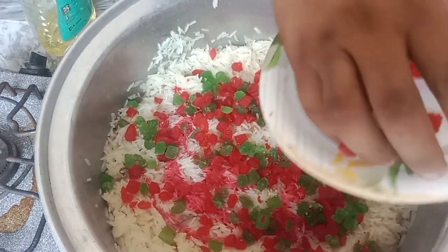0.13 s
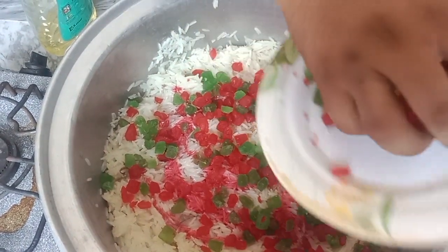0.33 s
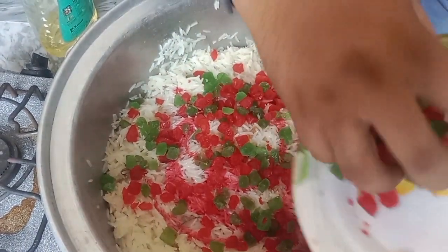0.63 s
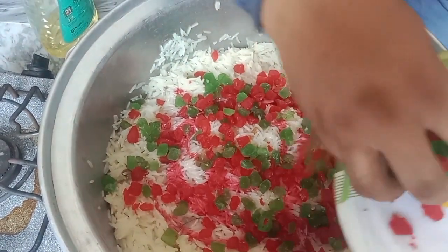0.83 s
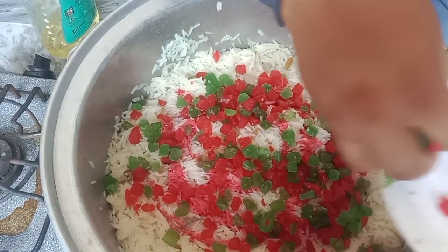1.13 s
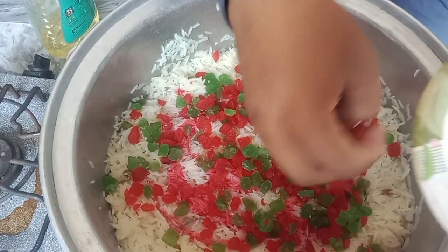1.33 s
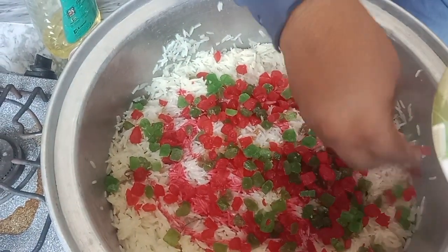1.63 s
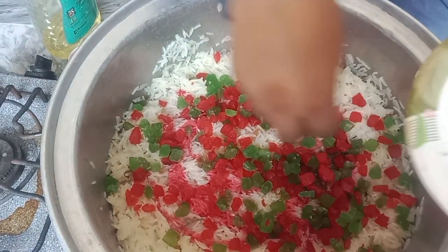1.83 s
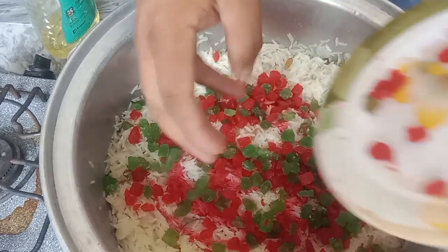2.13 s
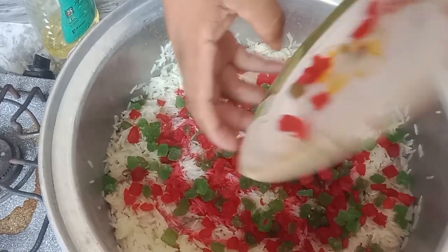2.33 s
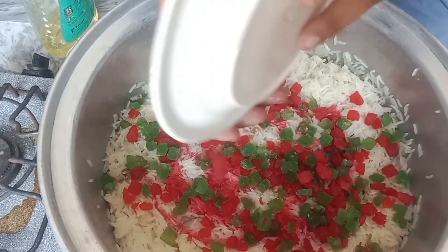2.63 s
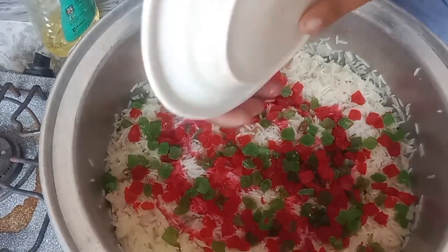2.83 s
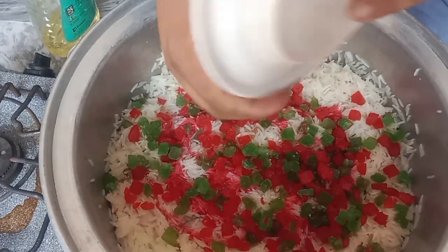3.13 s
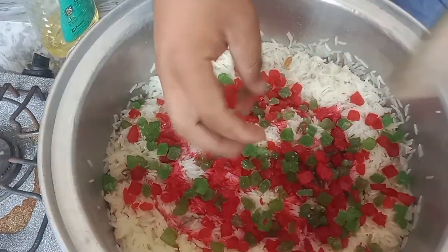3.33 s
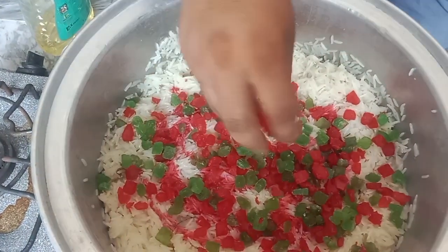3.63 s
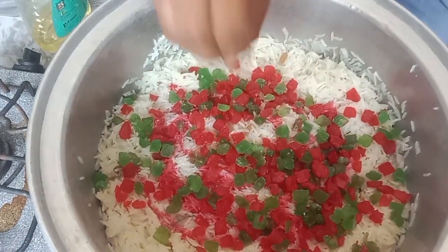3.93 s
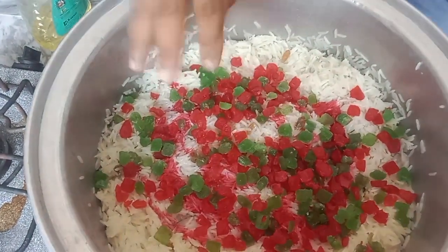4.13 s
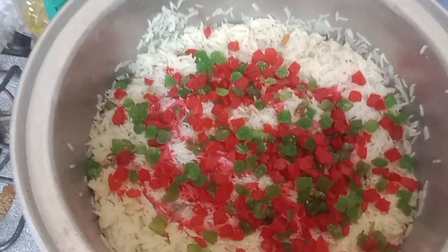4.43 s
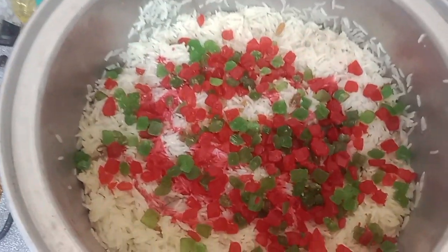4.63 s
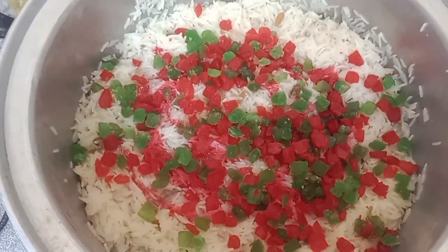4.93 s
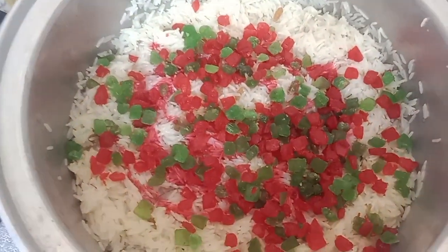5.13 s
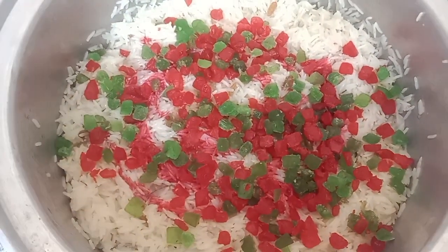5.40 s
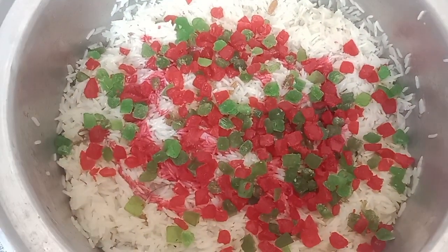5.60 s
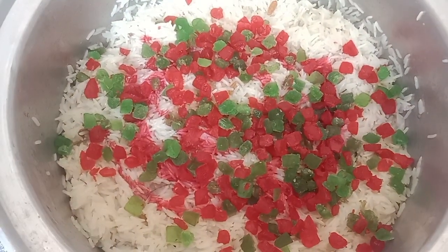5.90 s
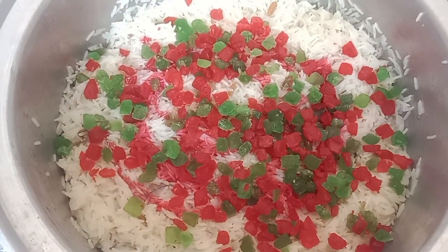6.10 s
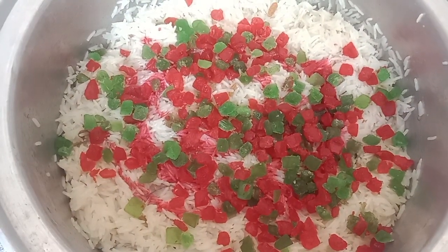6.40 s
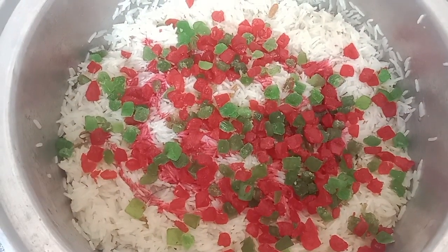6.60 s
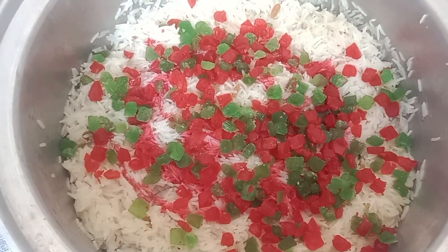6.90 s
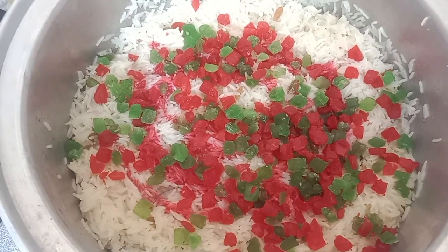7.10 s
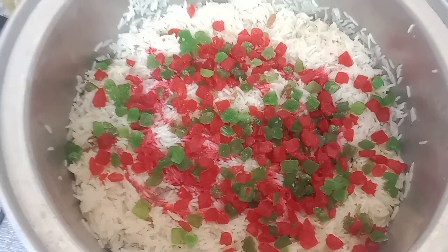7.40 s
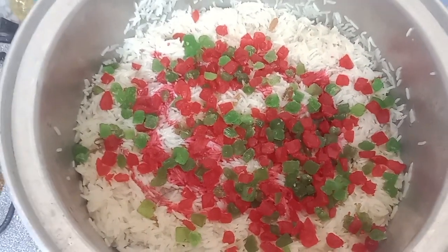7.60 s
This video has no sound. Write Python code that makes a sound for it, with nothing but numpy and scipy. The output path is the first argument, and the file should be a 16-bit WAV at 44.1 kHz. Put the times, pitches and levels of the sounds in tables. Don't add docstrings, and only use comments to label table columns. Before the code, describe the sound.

Rice sizzles softly and crackles in a metal pot as small pieces patter in, then a bowl and dishes clatter and a stool scrapes.

```python
import sys
import numpy as np
from scipy import signal
from scipy.fft import rfft, irfft, next_fast_len
from scipy.io import wavfile
from scipy.ndimage import uniform_filter1d

SR = 44100
rng = np.random.default_rng(int(sys.argv[2]) if len(sys.argv) > 2 else 0)


def undo_db(level):
    steps = np.asarray(level, float) / 20
    return 10 ** steps


def int16_out(signal):
    q = np.round(np.clip(np.atleast_2d(signal).T, -1, 1) * 32767)
    wavfile.write(sys.argv[1], SR, q.astype(np.int16))


N = 341775

# time in seconds, level in dB.
HEAT = [(0, -51), (.6, -54.5), (1.06, -52.5), (1.3, -51.5), (2.178, -52.5), (3.5, -51.5), (4.06, -50.5),
        (4.66, -44.5), (5.251, -43.5), (5.7, -43.5), (6.24, -48.5), (6.6, -50), (7.0, -46.5), (7.45, -52.5),
        (7.75, -51)]
# start in seconds, time held in seconds, then the lift in dB
OPENINGS = [(.03, 0.026, -2, 2, 3), (.2, 0.046, 0.5, -2, -6), (.27, 0.15, 2.5, 1, 9),
            (0.572, 0.18, 0, 2.5, 4.5), (.8, 0.14, 0.5, 4, 10), (1.035, 0.13, -3.5, -4, 0.5),
            (1.18, 0.022, 5.5, 8.5, 9.5), (1.36, 0.11, -1, 6.5, 6), (1.52, 0.02, 0.5, 2.5, 13),
            (1.671, 0.25, 2.5, 8, 7.5), (1.9, 0.018, -3.5, -13, -6), (2.24, 0.023, 2, 6, -1.5),
            (2.36, 0.046, 2.5, 0.5, 11), (2.55, 0.047, 2, 8, 8), (2.72, 0.17, 1.5, 3, 1.5),
            (2.9, 0.065, 0.5, 5.5, 5.5), (3.05, 0.055, 3.5, 10, 5), (3.2, 0.12, 0.5, 5.5, 3.5),
            (3.4, 0.28, 0, 0.5, 1), (3.58, 0.069, 3, 8, 5.5), (3.859, 0.036, 6.5, 8.5, 7),
            (4.03, 0.093, 0, -10, 0.5), (4.2, 0.26, -1, -6, -7), (4.379, 0.14, 6, 7.5, 16),
            (4.56, 0.13, 0.5, -9.5, 5), (4.67, 0.03, -2, 1, -20), (4.801, 0.086, 2, 10.5, 22),
            (4.96, 0.13, 3, -0.5, 10), (5.3, 0.1, -1, -11, -11), (5.481, 0.13, 2, 6.5, 6.5),
            (5.698, 0.009, -1, -7.5, -4), (5.761, 0.14, 3, 2, 5), (5.9, 0.092, 1, 7, 2),
            (6.05, 0.017, 0, -8, 0), (6.109, 0.11, 2, 6, 3.5), (6.5, 0.078, 1, 7, 2.5),
            (6.72, 0.027, 0, 7, 8), (6.84, 0.065, 1.5, 15, 15), (7.511, 0.054, 2, 8, 6),
            (7.7, 0.056, 1.5, 2, 13.5)]
PHONE_LOWERED = (3.3, 6.82)
# frequency in Hz, level in dB per Hz.
FIZZ_HIGH_COLOUR = [(1100, -31.5), (1700, -16.5), (2050, -14), (2400, -4.5), (3200, -5), (4500, -11.5),
                    (4950, -21), (5400, -17.5), (6100, -22), (6500, -17.5), (7700, -18), (8800, -25),
                    (9300, -80), (12700, -52)]
# frequency in Hz, level in dB per Hz.
FIZZ_CLOSE_COLOUR = [(880, -50), (1500, -52), (1660, -15), (1900, -35), (2100, -25), (2250, -6.5),
                     (2400, -5), (2900, 0.5), (5400, -8.5), (6210, -17.5), (7560, -10.5), (9800, -32.5),
                     (12700, -25), (21600, -120)]
# frequency in Hz, level in dB per Hz.
SPIT_COLOUR = [(5290, 8), (9000, -1), (9460, -2), (10900, -7), (12900, 6.5), (14000, -5), (14900, 3),
               (15800, -20.5)]
# time in seconds, peak in dB.
SHOWERS = [
    (4.379, -45.5),
    (5.12, -68),
    (6.83, -63),
]
# time in seconds, peak in dB.
SINGLE_SPITS = [(2.7763, -50), (3.0275, -53), (4.375, -36), (4.8813, -52), (5.485, -46), (6.7506, -46),
                (6.9172, -56), (7.0494, -46), (7.1252, -58), (7.512, -45),
                (0.4115, -61), (1.441, -56), (1.9026, -57), (1.9415, -55), (2.5641, -58.5), (2.777, -50),
               (2.9724, -53), (3.028, -55), (3.0764, -58), (4.375, -43), (4.8813, -42), (5.1677, -49),
               (5.3353, -62), (5.4844, -51), (5.5742, -50), (6.262, -51), (6.3974, -59), (6.4971, -59.5),
               (6.6962, -60), (6.8274, -45), (6.9172, -56), (7.0025, -55.5), (7.0499, -51), (7.1248, -53),
               (7.2998, -57), (7.5124, -47)]
# frequency in Hz, level in dB per Hz.
HUM_COLOUR = [(110, -50.5), (180, -20), (440, -12.5), (660, -27.5), (780, -2), (850, 4), (1040, -12),
              (1150, -36.5)]
# frequency in Hz, level in dB per Hz.
UPPER_HUM_COLOUR = [(900, -54), (1040, -20.5), (1210, -14.5), (1290, -5.5), (1380, -12.5), (1480, -15.5),
                    (1650, -15.5), (1900, -20), (2150, -13), (2730, -60)]
# time in seconds, peak in dB, ring in Hz.
CRACKLES = [(0.0305, -35, 2430), (0.185, -31.5, 2510), (0.3005, -48, 2540), (0.4294, -44, 3000),
            (0.6285, -38, 1450), (0.6649, -42.5, 2420), (0.8126, -37.5, 1060), (0.8614, -38, 1000),
            (0.999, -33.5, 2500), (1.0081, -40.5, 3730), (1.1905, -37, 1860), (1.2491, -30, 2900),
            (1.2756, -33.5, 2940), (1.321, -40, 2360), (1.3312, -33.5, 2700), (1.502, -46, 3000),
            (1.65, -45.5, 2920), (1.669, -29.5, 2100), (1.703, -33.5, 1500), (1.715, -37, 2550),
            (1.797, -46.5, 2660), (1.8424, -33, 2390), (1.8736, -35, 2800), (1.945, -40.5, 2500),
            (2.1555, -40.5, 2450), (2.3805, -31, 3220), (2.6954, -31, 3020), (2.7661, -31, 2950),
            (3.0924, -36, 2800), (3.1346, -32, 3100), (3.356, -33, 2500), (3.439, -38, 3330),
            (3.493, -38, 2280), (3.526, -35, 2730), (3.8676, -31.5, 2000), (3.805, -33.5, 5500),
            (4.036, -34.5, 2950), (4.119, -38.5, 6100), (4.145, -39, 3560), (5.1637, -28.5, 2840),
            (5.8462, -27, 4740), (5.991, -31.5, 2900), (6.052, -39.5, 5530), (6.201, -52, 1185)]
# time in seconds, peak in dB, ring in Hz, crack in dB.
FAT_POPS = [
    (4.175, -32, 3560, -19),
    (5.261, -35.5, 3400, -10),
    (5.75, -40, 870, -35),
    (5.772, -26.5, 2500, -11),
    (5.955, -27, 3290, -11.5),
    (6.097, -35, 3420, -7.5),
    (6.129, -34.5, 906, -18),
    (6.414, -31, 3900, -11),
    (7.554, -33, 1260, -11.5),
    (7.684, -29, 1320, -28),
]
# time in seconds, peak in dB, ring in Hz, crack in dB.
FRUIT = [(0.129, -22.5, 2560, -21), (0.265, -31.5, 3670, -33.5), (0.379, -27.5, 934, -23),
         (0.469, -37, 2360, -9), (0.486, -33, 3450, -21), (0.793, -35.5, 1130, -35.5),
         (1.172, -30, 2500, -39), (1.212, -29.5, 2450, -12.5), (1.354, -27, 3400, -18),
         (1.419, -28, 2480, -14.5), (1.442, -18, 2900, -12.5), (1.52, -36, 1300, -1),
         (1.662, -28.5, 886, -7.5), (1.696, -27.5, 3360, -12), (1.999, -34, 3260, -3.5),
         (2.349, -30, 3070, -17), (3.409, -37, 2840, -8.5), (3.827, -23.5, 1990, -18)]
# time in seconds, peak in dB, ring in Hz, crack in dB.
KNOCKS = [(4.377, -25, 1010, -16), (4.402, -23.5, 1090, -6), (4.456, -20.5, 1100, -15.5),
          (4.51, -21, 3350, -24), (4.594, -33, 1140, -22), (4.618, -29.5, 3500, -17),
          (4.784, -30, 1010, -5), (4.794, -36.5, 1010, 3), (4.837, -15.5, 3520, -19.5),
          (4.874, -8.5, 2750, -15.5), (4.89, -13.5, 2140, -13), (5.033, -23, 2640, -33),
          (5.095, -28.5, 3670, -17), (6.648, -13.5, 490, -32), (6.738, -27, 620, -29),
          (6.696, -23, 2400, -11), (6.75, -28, 4330, -13), (6.762, -23, 860, -27.5),
          (6.832, -21, 1004, -15), (6.905, -25, 2700, -20)]
# frequency in Hz, level in dB.
CRACK_COLOUR = [(300, -26.5), (1000, -5.5), (2200, 4.5), (4300, 2), (5800, -9.5), (7800, 5), (9500, -49),
                (13000, -29), (16000, -44)]
# start in seconds, level in dB, hollow in Hz, held in seconds.
BUMPS = [(.17, -66, 431, 0.19), (.27, -68, 382, 0.014), (1.23, -66.5, 444, 0.043), (1.529, -64, 497, 0.018),
         (2.249, -62, 322, 0.048), (2.27, -63.5, 660, 0.019), (2.37, -64, 488, 0.089),
         (2.56, -77, 260, .04), (2.6, -66, 510, 0.027), (2.54, -63.5, 690, 0.064),
         (3.044, -39.5, 277, 0.04), (3.059, -55.5, 416, 0.083), (3.22, -60.5, 291.6, 0.07),
         (3.449, -64, 459, 0.027), (3.562, -42.5, 402, 0.0098), (3.6, -53, 298, 0.047),
         (3.62, -53, 475.5, 0.041), (3.809, -68, 240, 0.059), (4.31, -81, 520, 0.056),
         (4.744, -55, 433, 0.1), (4.88, -50, 498, 0.062), (5.002, -48.5, 335, 0.07),
         (5.099, -53.5, 315, 0.029), (5.413, -57, 423, 0.24), (5.472, -43, 261, 0.098),
         (5.85, -60, 421, 0.049), (5.886, -44.5, 395, 0.028), (5.931, -52.5, 326, 0.028)]
# time in seconds, level in dB, pitch in Hz.
BOWL_TIPPED = (3.565, -41, 690)
# start in seconds, time held in seconds, ring in dB.
RIM_SKIDS = [
    (4.377, 0.0084, -31.5),
    (4.404, 0.017, -26),
    (4.455, 0.052, -40.5),
    (4.59, 0.19, -55),
]
# start in seconds, time held in seconds, level in dB.
BASE_DRAGS = [
    (4.405, 0.011, -30),
    (4.46, 0.089, -47.5),
]
# frequency in Hz, width in Hz, level in dB.
BOWL_MODES = [(550, 64, -24), (1010, 41, 5.5), (1246, 50, 0.5)]
# start in seconds, time held in seconds, level in dB.
DISH_SHAKES = [
    (4.784, 0.023, -30),
    (4.826, 0.02, -30.5),
    (4.879, 0.015, -25),
    (5.05, 0.15, -51.5),
]
# frequency in Hz, width in Hz, level in dB.
DISH_MODES = [(1010, 19, 8), (1300, 42, 6), (1730, 99, -13), (2240, 22, 9), (2700, 19, -6), (3700, 20, -18)]
# frequency in Hz, level in dB per Hz.
CLATTER_COLOUR = [(350, -63), (600, -28), (910, -38), (986, -35.5), (1150, -38.5), (1240, 10), (2400, 10),
                  (7200, -10.5), (9500, -36), (12400, -91), (20900, -120)]
# start in seconds, held in seconds, dB, pitch in Hz.
HELD_NOTES = [(4.376, 0.065, -42.5, 518), (4.5, 0.044, -57.5, 528), (4.515, 0.104, -46, 1025),
              (4.619, 0.087, -55, 1042), (4.784, 0.03, -48.5, 490), (4.84, 0.031, -38, 1700),
              (4.885, 0.048, -33, 2250), (4.89, 0.018, -38, 1100), (4.46, 0.019, -53, 485),
              (4.478, 0.013, -38, 1030), (6.656, .02, -39.5, 3000), (6.651, 0.0079, -23, 470),
              (6.66, 0.074, -28, 920), (6.659, 0.042, -33.5, 1352), (6.707, 0.021, -31.5, 1370),
              (6.701, .06, -33.5, 400), (6.7, 0.051, -38, 1200), (6.78, 0.015, -33, 850),
              (6.831, 0.078, -42, 290), (6.83, 0.027, -43, 430), (6.84, 0.053, -33, 916),
              (6.95, 0.018, -43, 930), (7.0, 0.031, -44.5, 300), (7.1, 0.13, -69, 1300),
              (.27, 0.017, -57, 1080), (2.7, 0.034, -56, 1098), (3.04, 0.023, -62, 620),
              (5.3, 0.064, -70, 640), (7.5, .1, -62, 1500)]
# start in seconds, time held in seconds, then the level in dB
STOOL_SLIPS = [
    (6.653, 0.0062, -36, -20, -34.5),
    (6.702, 0.011, -40, -20, -28),
    (6.745, 0.0091, -38, -34, -38),
    (6.789, 0.0027, -22.5, -31.5, -36),
    (6.809, 0.0059, -45, -21.5, -42),
    (6.832, 0.018, -22.5, -32, -31.5),
    (6.889, 0.011, -38, -29.5, -49),
    (6.939, 0.098, -43, -45, -48.5),
]
# frequency in Hz, width in Hz, level in dB.
LEG_MODES = [(381, 99, 4), (490, 120, -1.5), (675, 39, -3.5), (906, 190, -3.5), (1344, 58, -0.5)]
# frequency in Hz, level in dB per Hz.
GRIT_COLOUR = [(880, 2.5), (1500, 1.5), (1980, -8), (2320, -3.5), (4380, -12.5), (7570, -32), (9000, -44),
               (11700, -57), (19800, -120)]
# start in seconds, held in seconds, first pitch in Hz, settled pitch in Hz, dB.
CHIRPS = [
    (3.772, 0.091, 2662, 2036, -43),
    (5.703, 0.047, 3300, 2810, -50.5),
    (5.815, 0.069, 3483, 2620, -43),
]
# time in seconds, peak in dB.
TAP = (7.5127, -13.5)
# time in seconds, level in dB.
RUSTLE = (7.682, -44.5)
# time in seconds, peak in dB, time held in seconds.
FLUTTERS = [(.25, -60.5, 0.036), (.96, -70.5, 0.011), (1.22, -71.5, 0.015), (1.68, -68.5, 0.15),
            (2.24, -67, 0.04), (2.55, -75, 0.02), (3.6, -68, 0.021), (3.87, -49.5, 0.016),
            (4.17, -59, 0.027), (4.33, -66, 0.016), (4.76, -53, 0.012), (5.64, -59, 0.0059),
            (5.89, -55.5, 0.0048), (6.7, -52, 0.03), (6.8, -51, 0.074), (7.32, -66, 0.03),
            (7.51, -62, 0.007), (7.68, -67.5, .07), (2.8, -89, 0.066), (3.99, -75, 0.013),
            (3.72, -80, 0.016)]
# frequency in Hz, level in dB per Hz.
FLAME_COLOUR = [(25, -34.5), (60, -7), (100, -2.5), (135, 6), (170, -4), (260, -21)]
# frequency in Hz, level in dB per Hz.
HUSH_COLOUR = [(25, -21), (60, 10), (130, -10.5), (300, 7), (600, 1), (1200, -20.5), (2500, -56)]


def sizzle():
    heat_db = np.interp(np.arange(N) / SR, *np.transpose(HEAT))
    s, held, fizz_lift, hum_lift, upper_lift = np.transpose(OPENINGS)
    opening = shapes(s, 0.048, held, 0.055)
    fizz_lift_db = fine(fizz_lift @ opening)
    bubbles = steam_bubbles(fizz_lift_db)
    close = np.interp(np.arange(N) / SR, PHONE_LOWERED, (0, 1))
    fizz = (1 - close) * coloured(bubbles, FIZZ_HIGH_COLOUR) + close * coloured(bubbles, FIZZ_CLOSE_COLOUR)
    hum = pot_hum(heat_db, fine(hum_lift @ opening), fine(upper_lift @ opening))
    return undo_db(heat_db + fizz_lift_db) * fizz + hum + spits(bubbles, heat_db)


def steam_bubbles(lift_db):
    bubbles = grains(0.47, spread_db=4, per_second=590)
    bubbles += 0.78 * bursts(32, 0.013, depth_db=0)
    bubbles += 0.56 * droplets(count=6000, centre_hz=3870, spread_db=3.5)
    bubbles = patchy(bubbles, depth_db=2.5)
    return bubbles + 0.36 * undo_db(lift_db) * droplets(count=1500, centre_hz=3600, spread_db=3)


def spits(bubbles, heat_db):
    splashes = patchy(bursts(24, 0.003, depth_db=28), depth_db=6.5)
    spit = coloured(1.9 * bubbles + splashes, SPIT_COLOUR)
    usual_db = heat_db.mean()
    gain = undo_db(0.86 * (heat_db - usual_db) + usual_db - 24)
    gain += swells(*np.transpose(SHOWERS), 0.004, 0, 0.071)
    gain += undo_db(-4.5) * swells(*np.transpose(SINGLE_SPITS), 0.001, 0, 0.0032)
    return gain * spit


def pot_hum(heat_db, low_lift_db, upper_lift_db):
    drone = patchy(grains(0.1, spread_db=5, per_second=220), depth_db=2.5)
    low, upper = coloured(drone, HUM_COLOUR), coloured(drone, UPPER_HUM_COLOUR)
    shaken = undo_db(-28) * rattling() + undo_db(-20.5) * slipping(1, 0.23)
    low_gain = undo_db(heat_db - 12.5 + low_lift_db) + shaken
    upper_gain = undo_db(heat_db - 14 + upper_lift_db) + 0.19 * shaken
    return low_gain * low + upper_gain * upper


def pops():
    rings, cracks, t = np.zeros(N + SR), np.zeros(N + SR), np.arange(SR // 20) / SR
    noise = coloured(rng.standard_normal(N), CRACK_COLOUR)
    crackles = [(s, db - 2, hz, -13) for s, db, hz in CRACKLES]
    for s, db, hz, crack_db in FRUIT + FAT_POPS + KNOCKS + crackles:
        here = slice(round(s * SR), round(s * SR) + len(t))
        ring_t60 = 0.026 * (1000 / hz) ** 0.6
        rise = 1 - np.exp(-t / 0.00081)
        ring_fade = rise * undo_db(db - 60 * t / ring_t60)
        crack_fade = rise * undo_db(db - 60 * t / 0.010)
        rings[here] += undo_db(-2) * ring_fade * np.sin(2 * np.pi * hz * t)
        rings[here] += undo_db(crack_db - 4.5) * crack_fade * np.sin(2 * np.pi * 2.1 * hz * t)
        band = signal.butter(2, [0.63 * hz, min(1.82 * hz, 8500)], "bandpass", fs=SR, output="sos")
        jolt = unit(signal.sosfilt(band, rng.standard_normal(len(t))))
        snap = signal.sosfilt(band, t == 0)
        rings[here] += undo_db(crack_db + 7.5) * crack_fade * jolt
        rings[here] += undo_db(db + crack_db + 2.5) * snap / snap.max()
        cracks[here] += undo_db(crack_db - 1) * crack_fade
    return filtered(rings[:N] + cracks[:N] * noise, lambda hz: 1 / np.sqrt(1 + (hz / 8800) ** 16) + 0.098)


def bumps():
    s, db, hz = BOWL_TIPPED
    out = swells(s, db, 0.0082, 0, 0.052) * narrow(np.full(N, hz), width_hz=100)
    rise_s = 0.0077
    for hand in (BUMPS[::2], BUMPS[1::2]):
        s, db, hz, held = np.transpose(hand)
        latest = np.clip(np.searchsorted(s - 2 * rise_s, np.arange(N) / SR) - 1, 0, None)
        out += swells(s, db, rise_s, held, 0.043) * narrow(hz[latest], width_hz=94)
    return out


def bowl():
    skid = grains(0.25, spread_db=-7, per_second=190)
    ring = resonant(skid, [(900, 1600, 0)])
    ring = resonant(resonant(ring, BOWL_MODES), BOWL_MODES)
    scuff = coloured(grains(0.042, spread_db=7, per_second=140), CLATTER_COLOUR)
    s, held, db = np.transpose(RIM_SKIDS)
    skidding = swells(s, db, 0.0032, held, 0.04)
    s, held, db = np.transpose(BASE_DRAGS)
    return skidding * ring + swells(s, db - 8, 0.016, held, 0.091) * scuff


def dishes():
    hits = grains(0.15, spread_db=34, per_second=460)
    ring = filtered(resonant(hits, DISH_MODES), lambda hz: 1 / (1 + (hz / 7000) ** 6))
    return 0.85 * rattling() * unit(0.65 * ring + coloured(hits, CLATTER_COLOUR))


def rattling():
    s, held, db = np.transpose(DISH_SHAKES)
    return swells(s, db, 0.0032, held, 0.17)


def notes():
    out, t = np.zeros(N), np.arange(-SR // 50, SR // 4) / SR
    for s, held, db, hz in HELD_NOTES:
        shape = undo_db(db - 20 * np.maximum(np.maximum(-t / 0.0032, (t - held) / 0.066), 0))
        note = narrow(np.full(len(t), hz), 0.073 * hz, steady=0.54)
        out[round(s * SR) - SR // 50:][:len(t)] += shape * note
    return out


def stool():
    slips = grains(0.27, spread_db=0, per_second=280)
    boom = resonant(resonant(slips, [(223, 120, 0)]), [(283, 43, 8), (214, 130, -0.5)])
    dull = resonant(slips, [(720, 450, 0)])
    seat = resonant(resonant(dull, [(630, 670, 0)]), [(625, 530, 0)])
    legs = unit(resonant(resonant(dull, LEG_MODES), LEG_MODES) + 0.5 * seat)
    grit = coloured(slips, GRIT_COLOUR)
    return 0.7 * slipping(0, 0.13) * boom + 0.6 * slipping(1, 0.12) * legs + slipping(2, 0.11) * grit


def slipping(part, fall_s):
    s, held, *db = np.transpose(STOOL_SLIPS)
    return swells(s, db[part], 0.0074, held, fall_s)


def bird():
    out, t = np.zeros(N), np.arange(-SR // 20, SR // 3) / SR
    for (s, held, first_hz, settled_hz, db), width_hz in zip(CHIRPS, (620, 220, 150)):
        glide = np.exp(-np.clip(t, 0, 1) / 0.016)
        shape = undo_db(db - 20 * np.maximum(np.maximum(-t / 0.0099, (t - held) / 0.1), 0))
        whistle = narrow(settled_hz + (first_hz - settled_hz) * glide, width_hz, steady=0.1)
        out[round(s * SR) - SR // 20:][:len(t)] += shape * whistle
    return out


def tap():
    out, t = np.zeros(N), np.arange(SR // 20) / SR
    jolt = -(t / 0.00018) * np.exp(1 - t / 0.00014)
    swing = 1.3 * np.sin(2 * np.pi * 190 * t) * np.exp(-t / 0.001)
    out[round(TAP[0] * SR):][:len(t)] = undo_db(TAP[1]) * (jolt + swing)
    return out


def rustle():
    brush = grains(0.72, spread_db=-11, per_second=290)
    colour = [(500, -71), (900, 13), (1500, 7), (2700, 8.5), (5000, -9)]  # Hz, dB per Hz
    return swells(*RUSTLE, 0.016, 0.025, 0.23) * coloured(brush, colour)


def flame():
    s, db, held = np.transpose(FLUTTERS)
    gain = undo_db(-80) + swells(s, db, 0.066, held, 0.038)
    return gain * coloured(rng.standard_normal(N), FLAME_COLOUR)


def hush():
    return undo_db(-78) * coloured(bursts(count=4, length_s=0.03, depth_db=2), HUSH_COLOUR)


def kitchen(x, t60):
    t = np.arange(SR // 2) / SR
    tail = signal.lfilter([1], [1, -0.6], rng.standard_normal(len(t))) * undo_db(-60 * t / t60)
    return signal.fftconvolve(np.pad(x, (300, 0)), tail / np.linalg.norm(tail))[:N]


def grains(share, spread_db, per_second):
    size = np.minimum(rng.exponential(size=N), 2)
    ticks = (rng.random(N) < per_second / SR) * undo_db(spread_db * size) * rng.choice([-1, 1], N)
    return np.sqrt(1 - share) * rng.standard_normal(N) + np.sqrt(share) * unit(ticks)


def bursts(count, length_s, depth_db):
    flares = (rng.random(N) < count / SR) * np.minimum(rng.exponential(size=N), 3)
    glow = signal.lfilter([1], [1, -np.exp(-1 / (length_s * SR))], flares)
    return unit(rng.standard_normal(N) * (1 + undo_db(depth_db) * glow))


def droplets(count, centre_hz, spread_db):
    when, pitch, size = rng.random((count, 3)).T
    hz = centre_hz * 3 ** (2 * pitch - 1)
    k = np.arange(128)
    cycles = hz[:, None] * k / SR
    level = undo_db(-spread_db * np.log(size + 0.021)) * np.sqrt(hz)
    shape = level[:, None] * np.sin(2 * np.pi * cycles) * np.exp(-cycles / 0.38)
    place = (when * N).astype(int)[:, None] + k
    return unit(np.bincount(place.ravel(), shape.ravel(), N + len(k))[:N])


def narrow(hz, width_hz, steady=0.41):
    noise = rng.standard_normal(len(hz)) + 1j * rng.standard_normal(len(hz))
    slow = signal.sosfilt(signal.butter(3, width_hz / SR, output="sos"), noise)
    carrier = np.exp(2j * np.pi * np.cumsum(hz) / SR)
    return unit(np.real(slow / (np.abs(slow) + 1e-9) ** steady * carrier))


def patchy(x, depth_db):
    z = signal.stft(x, nperseg=512)[2]
    field = uniform_filter1d(rng.standard_normal(z.shape), size=3, axis=0)
    field = unit(uniform_filter1d(field, size=20, axis=1))
    return signal.istft(z * undo_db(depth_db * np.minimum(field, 0.6)), nperseg=512)[1][:N]


def suppressed(x, strength, least):
    z = signal.stft(x, nperseg=512)[2]
    power = np.abs(uniform_filter1d(np.abs(z) ** 2, size=5, axis=1)) + 1e-20
    usual = np.quantile(power[:, ::4], 0.3, axis=1)[:, None]
    gain = np.sqrt(np.clip(1 - strength * usual / power, least, 1))
    return signal.istft(z * gain, nperseg=512)[1][:N]


def shapes(s, rise_s, held_s, fall_s):
    late = np.arange(0, N, 32) / SR - np.reshape(s, (-1, 1))
    over = (late - np.reshape(held_s, (-1, 1))) / fall_s
    return undo_db(-20 * np.maximum(np.maximum(-late / rise_s, over), 0))


def fine(coarse):
    return np.interp(np.arange(N), np.arange(0, N, 32), coarse)


def swells(s, db, rise_s, held_s, fall_s):
    return fine(np.sqrt(undo_db(np.reshape(db, -1)) ** 2 @ shapes(s, rise_s, held_s, fall_s) ** 2))


def unit(x):
    return x / np.sqrt(np.mean(x ** 2) + 1e-20)


def filtered(x, response):
    m = next_fast_len(N + SR // 2)
    return irfft(rfft(x, m) * response(np.fft.rfftfreq(m, 1 / SR)), m)[:N]


def coloured(x, spectrum):
    f, v = np.transpose(spectrum)
    db = np.interp(np.log(np.fft.rfftfreq(8192, 1 / SR) + 1), np.log(f), v, -120, -120)
    cepstrum = irfft(np.log(undo_db(np.maximum(db, v.max() - 80))))
    fold = np.r_[1, np.full(4095, 2), 1, np.zeros(4095)]
    impulse = irfft(np.exp(rfft(cepstrum * fold)))[:4096]
    return unit(signal.oaconvolve(x, impulse)[:N])


def resonant(x, modes):
    def response(f):
        return sum((-1) ** k * undo_db(db) * 1j * f * w / (c * c - f * f + 1j * f * w)
                   for k, (c, w, db) in enumerate(modes))
    return unit(filtered(x, response))


def scene():
    near = pops()
    things = near + undo_db(-14) * kitchen(near, t60=0.26)
    things += bumps() + bowl() + dishes() + notes() + stool() + bird() + rustle()
    things = filtered(things, lambda hz: (1j * hz / (110 + 1j * hz)) ** 3)
    return (sizzle() + things + tap() + flame() + hush())[None]


def top_cut(x):
    return signal.sosfilt(signal.butter(12, 16510, fs=SR, output="sos"), x)


def record(dry):
    def microphone(hz):
        return (1j * hz / (60 + 1j * hz)) ** 3 * np.where(hz < 15700, 1, undo_db(-31))
    mix = suppressed(filtered(dry[0], microphone), strength=0.37, least=0.36)[None]
    return top_cut(mix)


dry = scene()
out = record(dry)
int16_out(out)
```